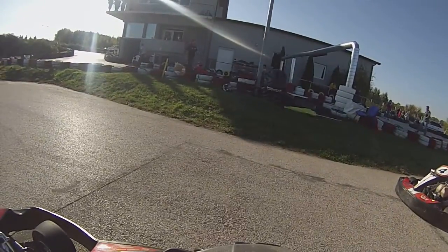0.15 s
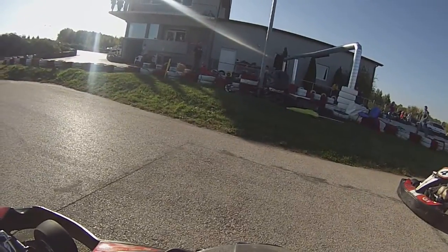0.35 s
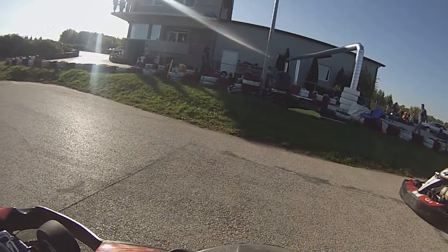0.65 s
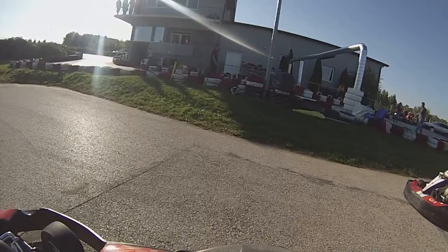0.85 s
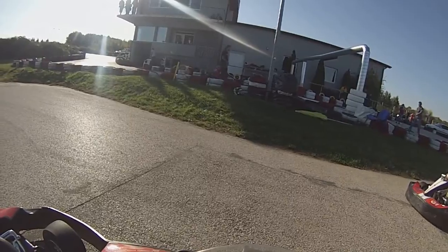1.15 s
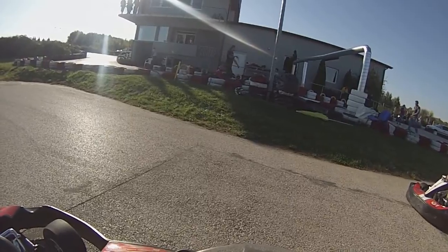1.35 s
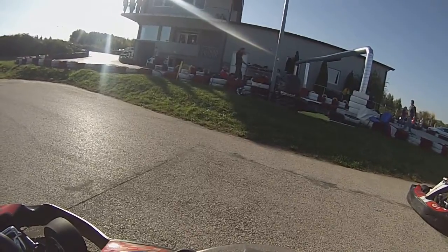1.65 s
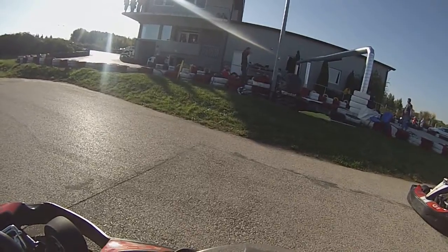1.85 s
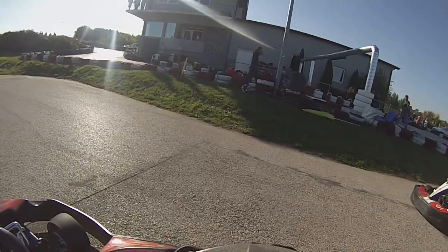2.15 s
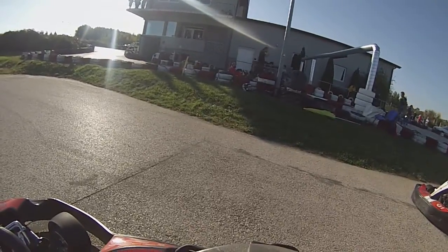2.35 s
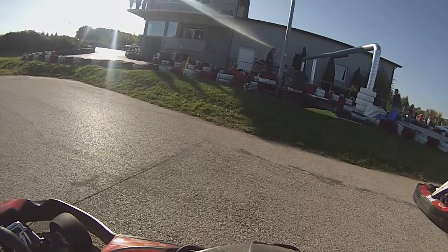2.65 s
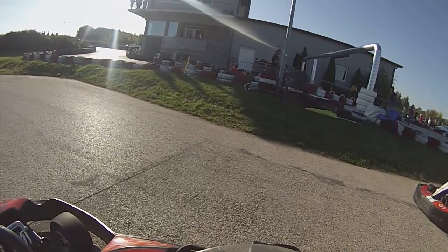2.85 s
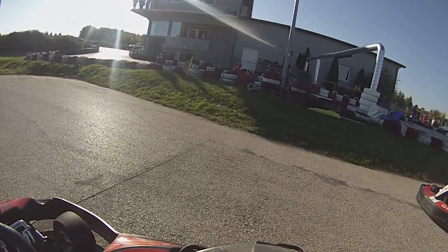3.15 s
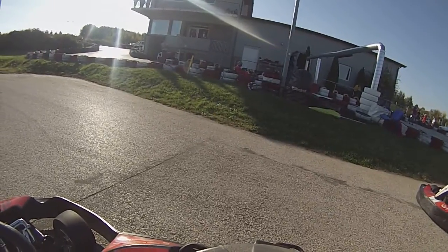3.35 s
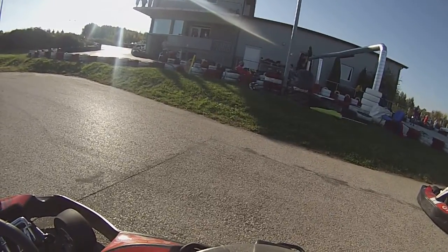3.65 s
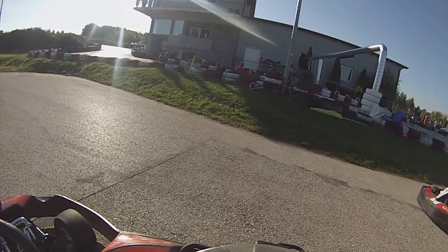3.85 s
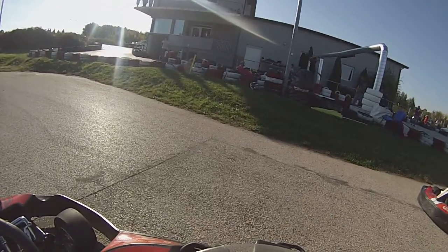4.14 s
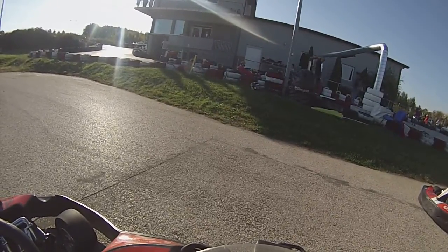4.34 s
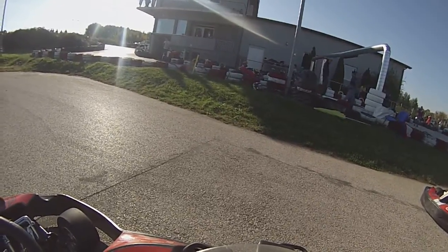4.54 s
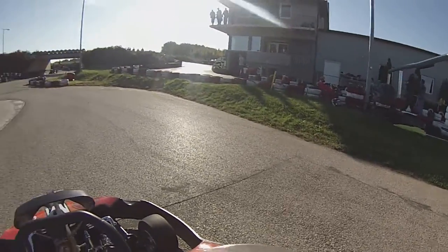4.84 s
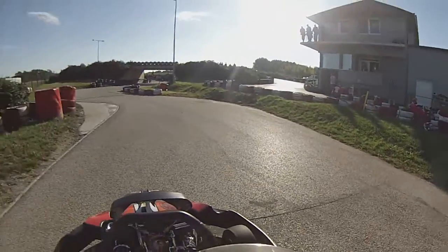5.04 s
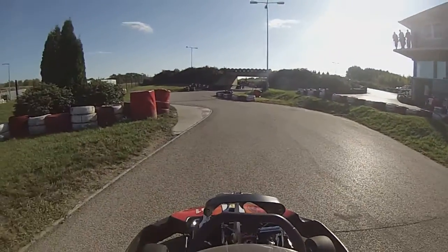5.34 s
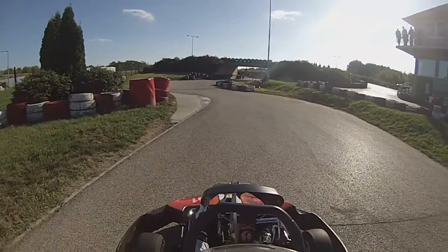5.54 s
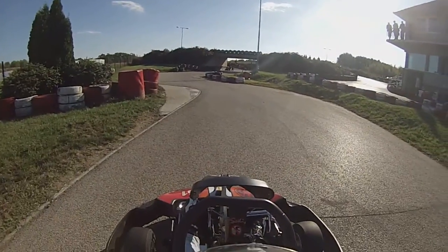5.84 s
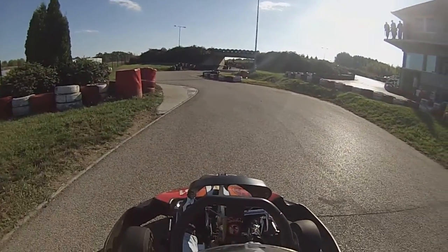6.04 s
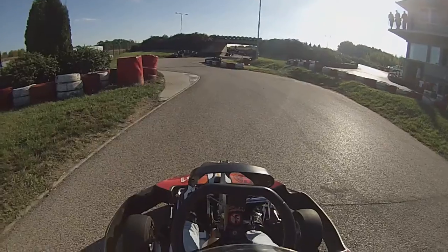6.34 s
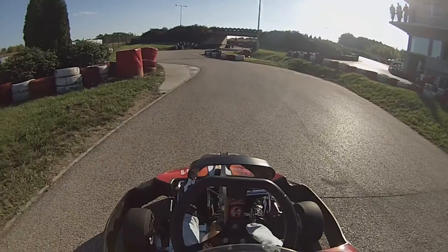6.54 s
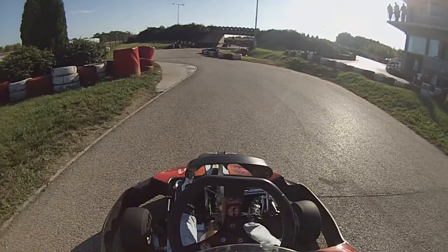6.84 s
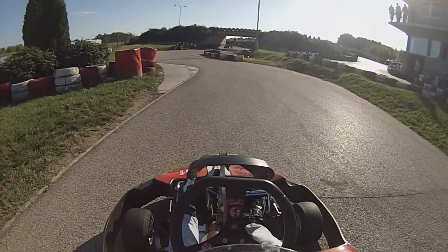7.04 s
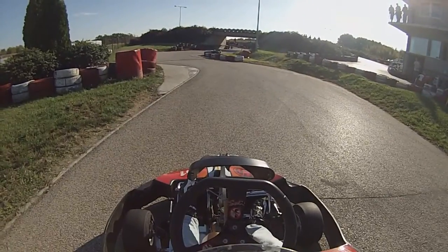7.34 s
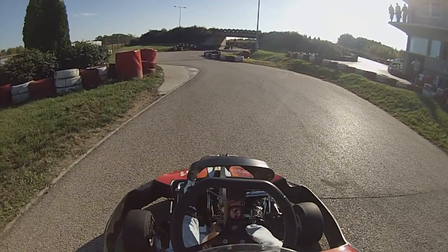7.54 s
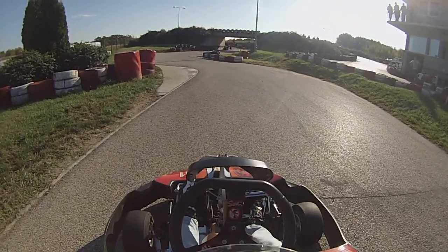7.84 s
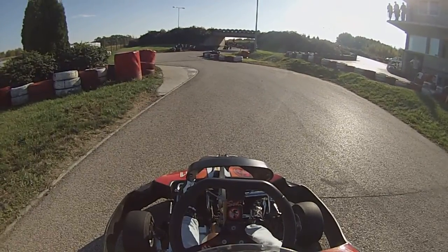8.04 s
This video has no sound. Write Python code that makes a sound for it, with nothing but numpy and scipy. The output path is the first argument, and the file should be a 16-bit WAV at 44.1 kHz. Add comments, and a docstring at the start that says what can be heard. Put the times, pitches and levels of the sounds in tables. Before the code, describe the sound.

Steady kart idle, close and boxy: deep vibration, rapid gas pulses and rattling casing repeat about fourteen times a second throughout. The low body thins when the driver looks ahead around five seconds, then the shake grows stronger once the head lowers. Behind it are blurred far engines, a wavering drone, low wind or handling bumps, faint hiss and a few loose-metal tinks. Open-air track, helmet-mounted microphone.

```python
"""A single-cylinder four-stroke kart engine idles right behind its driver, heard inside a housing on the helmet.
Crank-locked sines shake the seat, gas pulses swell in silencer and intake, and contacts and noise
ring the casing, valve cover and small parts. The driver looks aside, turns ahead, then lowers the head,
which changes the colour. Around it lie far engines and a drone of shaped noise, low thuds, hiss and tinks."""
import sys
import numpy as np
from scipy import signal
from scipy.fft import rfft, irfft
from scipy.io import wavfile

SR = 44100
rng = np.random.default_rng(int(sys.argv[2]) if len(sys.argv) > 2 else 0)


def transcribe(signal):
    """Save signal, clipped to [-1, 1], as a 16-bit WAV file at the path in sys.argv[1]."""
    frames = np.atleast_2d(signal).T
    limited = np.clip(frames, -1, 1)
    pcm = np.round(limited * 32767).astype(np.int16)
    wavfile.write(sys.argv[1], SR, pcm)


N = 361179


def from_db(db):
    """Gain of a level in dB."""
    return 10 ** (np.asarray(db) / 20)


def rms_one(x):
    """Signal scaled to rms 1."""
    return x / np.sqrt(np.mean(x ** 2) + 1e-20)


def in_time(rows):
    """Columns of a curve table after its time column, one value a sample."""
    s, *columns = np.transpose(rows)
    return [np.interp(np.arange(N) / SR, s, c) for c in columns]


def at_pose(pose, values):
    """Blend of three values, one for each head pose: 0 aside, 1 ahead, 2 ahead and lowered."""
    return np.interp(pose, range(3), values)


def resonance(x, hz, width_hz):
    """Two-pole resonance with gain 1 on top."""
    r = np.exp(-np.pi * width_hz / SR)
    top = np.array([1, 0, -1]) * (1 - r * r) / 2
    bottom = [1, -2 * r * np.cos(2 * np.pi * hz / SR), r * r]
    return signal.lfilter(top, bottom, x + 1e-18)  # the tiny offset avoids denormal numbers


def coloured(spectrum):
    """Steady noise of a given spectrum, rms 1."""
    hz, db = np.transpose(spectrum)
    grid = np.arange(1, N // 2 + 2) * SR / N
    gain = from_db(np.interp(np.log(grid), np.log(hz), db))
    return rms_one(irfft(rfft(rng.standard_normal(N)) * gain, N))


def drift(hz):
    """Slow chance below a given rate, rms 1."""
    lowpass = signal.butter(2, hz, fs=SR, output="sos")
    settled = signal.sosfilt(lowpass, rng.standard_normal(N + SR))[SR:]
    return rms_one(settled)


def each_cycle(cycle, places, level_db, jitter, spread_db):
    """Clicks at given places of every cycle, a little different in time (in cycles) and strength each round."""
    rounds = np.arange(int(cycle[-1]) + 1)[:, None]
    late, louder = rng.standard_normal((2, len(rounds), len(places)))
    at = np.searchsorted(cycle, rounds + places + jitter * late).clip(0, N)
    strength = from_db(level_db + spread_db * louder)
    return np.bincount(at.ravel(), strength.ravel(), N + 1)[:N]


# Engine speed. Each row: time in seconds, four-stroke cycles per second.
SPEED = [(0.0, 14.124), (0.6, 13.95), (1.5, 13.874), (2.5, 13.812), (3.2, 13.853), (3.7, 14.057),
         (4.4, 14.074), (4.75, 13.878), (5.15, 13.424), (5.5, 13.242), (5.8, 13.331), (7.2, 13.976),
         (7.5, 13.915), (8.19, 13.787)]


def engine_cycle():
    """Cycles run so far: the summed speed, two crank turns to a cycle."""
    return np.cumsum(in_time(SPEED)[0]) / SR


# Head movement. Each row: time in seconds, head pose (0 aside, 1 ahead, 2 ahead and lowered).
HEAD = [(0, 0.13), (4.7, 0.24), (5.1, 0.87), (6.3, 1.24), (7.0, 2.56), (8.19, 2.3)]


def head_pose():
    """The driver's head pose through time."""
    return in_time(HEAD)[0]


# Shake through seat and helmet. Each row: time in seconds, then levels in dB of the once-per-turn shake,
# the firing rock and the twice-per-turn shake.
SHAKE = [(0, -35, -48, -35.5), (.9, -34.5, -46, -36.5), (1.5, -33, -52, -34), (2.5, -33, -51, -35),
         (3.6, -31.5, -46, -36), (4.45, -31.5, -46, -34.5), (5.0, -36.5, -50, -40), (5.35, -39, -43, -42.5),
         (5.55, -34.5, -41.5, -44), (5.85, -29, -42, -41), (6.05, -29, -43, -41.5), (6.2, -32, -43, -42),
         (6.4, -29.5, -43, -41), (6.6, -29, -42, -40), (6.88, -26.5, -41, -35), (7.1, -26.5, -40, -34.5),
         (8.19, -27, -40.5, -33.5)]
# Hum that throbs while the engine runs slowest. Each row: time in seconds, level in dB near 95 Hz and near 80 Hz.
HUM = [(0, -66, -70), (4.7, -66, -62), (4.9, -60, -48), (5.2, -50, -47), (5.4, -45.5, -47),
       (5.9, -46, -48.5), (6.3, -47.5, -47), (6.6, -47, -48), (6.9, -55, -62), (8.19, -80, -80)]
# Sines for those five levels in turn. Each row: multiple of the cycle rate, offset in turns of the sine
# in each of the three head poses.
SHAKE_ORDERS = [(2, .76, .76, .79), (3, .33, .10, .17), (4, .95, .90, .90), (7, .76, .76, .76),
                (6, .38, .38, .38)]
# Slip of the once-per-turn shake against the crank while the head settles.
# Each row: time in seconds, slip in turns of the sine.
SLIP = [(0, 0), (4.6, 0), (5.2, -.05), (5.65, .12), (5.9, .1), (6.2, 0), (8.19, 0)]


def shake(cycle, pose):
    """Piston forces are clean sines locked to the crank; head pose shifts them, a loose helmet makes them waver."""
    slip = in_time(SLIP)[0]
    out = 0
    for (order, *offsets), db in zip(SHAKE_ORDERS, in_time(SHAKE) + in_time(HUM)):
        level = np.sqrt(2) * from_db(db + 1.33 * drift(5.0))
        turns = order * cycle + at_pose(pose, offsets) + 0.029 * drift(7.1)
        if order == 2:  # once per crank turn
            turns = turns + slip
        out = out + level * np.sin(2 * np.pi * turns)
    return out


# Gas pulses, each in a hollow of its own. Each row: place in the cycle 0-1, resonance in Hz, width in Hz,
# delay in cycles while looking ahead, relative level in dB in each of the three head poses.
PULSES = [(.448, 83.6, 43, 0, -4.6, -6, -4.6), (.516, 165.6, 28, .011, -6.3, -1.5, -5.5),
          (.551, 60.7, 64, 0, -.6, 0, 0), (.654, 93.4, 23, -.008, 0, -1, -1.5),
          (.705, 191.5, 60, .005, -10.5, -12, -10.5)]
# Weaker pulses in the intake, columns as for the gas pulses.
INTAKE = [(0.27, 280, 60, 0, -18, -14, -13), (0.69, 300, 80, 0, -17, -16, -17),
          (0.0, 365, 70, .07, -18, -20, -15), (.09, 137, 45, 0, -22, -10, -22)]


def gas_pulses(cycle, pose):
    """Each push goes twice through its resonance, so it swells before it dies; all vary together in strength."""
    strength = from_db(0.64 * drift(5.3))
    ahead = at_pose(pose, [0, 1, 0])
    out = 0
    for place, hz, width_hz, delay, *levels_db in PULSES + INTAKE:
        clicks = each_cycle(cycle - delay * ahead, np.array([place]), 0, jitter=.002, spread_db=.6)
        push = strength * from_db(at_pose(pose, levels_db)) * clicks
        out = out + resonance(resonance(push, hz, width_hz), hz, width_hz) / width_hz
    return rms_one(out)


# Swell of the resonances once a cycle. Each row: resonance in Hz, swing in dB, place of the top in the cycle 0-1.
SWELL = [(400, 2, .3), (770, 1.4, 0.62), (1300, 1.5, 0.1), (1360, 0.9, 0.82), (1560, 3.5, 0.79),
         (2180, 1, 0.18), (2400, 0, 0.8), (3400, 1, 0)]


def body(drive, modes, pose, cycle):
    """Parallel resonances whose levels follow the head, swell once a cycle and wander a little."""
    at_hz, swing_db, top = np.transpose(SWELL)
    wander = drift(1.7)
    out = 0
    for k, (hz, width_hz, *levels_db) in enumerate(modes):
        # a complex swing blends size and place of the top together
        swing = np.interp(hz, at_hz, swing_db * np.exp(-2j * np.pi * top))
        swell_db = np.real(swing * np.exp(2j * np.pi * cycle))
        wander_db = 0.24 * np.roll(wander, k * N // len(modes))
        level = from_db(at_pose(pose, levels_db) + swell_db + wander_db)
        out = out + (-1) ** k * resonance(level * drive, hz, width_hz)
    return out


# Rattle after valves land on their seats. Each row: place in the cycle 0-1, relative level in dB.
VALVES = [(.862, -7), (.94, -14), (.46, -11), (.14, -15)]
# Ring of the valve cover. Each row: resonance in Hz, width in Hz, relative level in dB in each of the three poses.
VALVE_RING = [(6840, 500, -35, -45, -42), (5650, 670, -39, -39.5, -39.5), (3630, 190, -36, -26, -34),
              (3164, 195, -31, -28, -29.5), (2050, 460, -30, -28, -27)]


def valves(cycle, pose):
    """Noise puffs swell in a moment, die over some 17 ms and partly repeat each cycle; they ring the cover."""
    place, puff_db = np.transpose(VALVES)
    rise, fade = np.exp(-1 / (np.array([0.0012, 0.017]) * SR))  # time constants in seconds
    landings = each_cycle(cycle, place, puff_db, jitter=.002, spread_db=.8)
    puff = signal.lfilter([1 - rise], np.convolve([1, -rise], [1, -fade]), landings)
    repeated = rng.standard_normal(3000)[(cycle % 1 * 3000).astype(int)]
    rattle = 1.2 * repeated + .75 * rng.standard_normal(N)
    ring = body(from_db(-7.5) * puff * rattle, VALVE_RING, pose, cycle)
    return signal.sosfilt(signal.butter(3, [1700, 7800], "band", fs=SR, output="sos"), ring)


# Contacts of valves, rockers and gears. Each row: place in the cycle 0-1, relative level in dB, sharpness 0-1.
CONTACTS = [(.02, -6, 0.1), (0.058, -12, 0), (.145, -7, 0), (.18, -12.5, 0.3), (.265, 0.5, 0),
            (0.368, -13.5, 0.1), (.49, -4.5, 0), (.56, -14.5, 0.3), (.61, 4, 0.3), (.68, -2, 0),
            (.755, -6, .25), (.82, 5.5, .3), (0.899, -25, 0.2), (.935, -4.5, 0.4), (.965, -13.5, 0.1)]
# Air rush and gear rattle through one cycle. Each row: place in the cycle 0-1, relative level in dB.
RUSH = [(0, 1), (.15, 0.3), (.27, -0.4), (.33, -3.5), (.43, -0.5), (.48, 1.5), (.65, -2.1), (.78, -1.4),
        (.9, 0.3)]
# Engine casing heard through the housing. Each row: resonance in Hz, width in Hz,
# relative level in dB in each of the three head poses.
CASING = [(380, 85, -19.5, -17, -19.5), (562, 63, -17, -17.5, -14.5), (756.4, 32, -10, -11.5, -12),
          (857, 72, -14, -15.5, -15), (1200, 106, -4.5, -0.5, -3), (1323.6, 83, -0.5, 2.5, 1),
          (1430, 89.3, 1, 0.5, 1), (1520, 120, -4.5, -3, -6.5), (1578, 46, -2.5, -5, -5.5),
          (1715, 94, -11, -15, -10.5), (1890, 67, -14.5, -12.5, -15), (2056, 32, -9, -9, -8.5),
          (2160, 68, -11.5, -10, -9), (2276, 57, -13.5, -12, -13.5), (2530, 84, -17.5, -20.5, -19.5),
          (2860, 77, -21.5, -25.5, -32), (3078, 125, -25, -41.5, -30), (3670, 570, -33, -31, -26.5),
          (3880, 170, -27.5, -23.5, -22), (4400, 1170, -31, -36.5, -33), (4640, 480, -28.5, -32, -29),
          (5950, 130, -35, -37, -32.5), (6560, 500, -36, -49, -45)]


def clatter(cycle, pose):
    """Contacts, a gear rattle that repeats every cycle and fan noise ring one casing; the valve rattle joins."""
    place, db, sharp = np.transpose(CONTACTS)
    sharp_db = db + 20 * np.log10(np.clip(sharp, .01, 2))
    blunt = each_cycle(cycle, place, db, jitter=.0004, spread_db=1.2)
    edge = np.diff(each_cycle(cycle, place, sharp_db, jitter=.0003, spread_db=1.2), prepend=0)
    teeth = each_cycle(cycle, rng.random(400), rng.normal(-19, 1.5, 400), jitter=.0002, spread_db=1.2)
    fan = from_db(-25.5) * rng.standard_normal(N)
    rush = from_db(np.interp(cycle, *np.transpose(RUSH), period=1))
    casing = body(from_db(-7) * blunt + edge + rush * (teeth + fan), CASING, pose, cycle)
    # the housing dulls the top
    casing = signal.sosfilt(signal.butter(2, 7400, fs=SR, output="sos"), casing)
    return rms_one(casing + from_db(-7) * valves(cycle, pose))


# Knocks of rockers and valves. Each row: place in the cycle 0-1, then relative level in dB
# in the rocker arms, in the cover and in the valve stems.
KNOCKS = [(.02, -2, -14, -18), (.09, 0, -14, -20), (.172, -3, -9, -8), (.478, -9, -10, -7),
          (.65, -5, -16, -24), (.79, -1, -16, -24), (.868, 0, 0, 0), (.93, 0, -7, -11)]
# What the knocks ring. Each row: part (0 rocker arms, 1 cover, 2 valve stems), resonance in Hz, width in Hz,
# peak in dB of a 0 dB knock in each of the three head poses.
KNOCK_RING = [(0, 2060, 180, -49.5, -50.5, -50), (0, 2290, 220, -54, -53, -52),
              (1, 3050, 350, -52, -59, -57), (1, 3700, 400, -58, -56, -58), (1, 5200, 900, -63, -64, -66),
              (2, 6900, 360, -57.5, -77, -74), (2, 9300, 1200, -73, -90, -88)]


def knocks(cycle, pose):
    """Soft-edged contacts: each ring swells to its peak and dies within a few ms."""
    place, *parts_db = np.transpose(KNOCKS)
    blows = [each_cycle(cycle, place, db, jitter=.0012, spread_db=1.3) for db in parts_db]
    out = 0
    for part, hz, width_hz, *levels_db in KNOCK_RING:
        ring = resonance(resonance(blows[int(part)], hz, width_hz), hz, width_hz)
        to_peak_one = np.e * SR / (2 * np.pi * width_hz)
        out = out + from_db(at_pose(pose, levels_db)) * to_peak_one * ring
    return out


# Spectrum of other engines around the track. Each row: frequency in Hz, relative density in dB per Hz.
FAR = [(10, -8), (45, -6), (90, -7), (125, -18.5), (200, -24), (280, -25), (450, -28), (650, -34),
       (1000, -40), (1500, -60)]
# Their loudness. Each row: time in seconds, level in dB.
FAR_LEVEL = [(0, -44.5), (1.8, -47), (5.6, -44.5), (6.4, -50.5), (7.0, -47), (7.5, -48.5), (7.9, -50),
             (8.19, -39)]


def far_engines():
    """Other engines blur into low coloured noise with a drifting level."""
    return from_db(in_time(FAR_LEVEL)[0] + 1.7 * drift(9.4)) * coloured(FAR)


# Bands of a wavering drone among the far engines. Each row: centre in Hz, width in Hz, relative level in dB.
DRONE = [(277.7, 52, 9.5), (383, 19, -1)]
# Loudness of the drone. Each row: time in seconds, level in dB.
DRONE_LEVEL = [(0, -70), (.9, -55.5), (1.7, -64), (3.2, -75), (3.6, -72), (4.6, -57), (5.0, -77),
               (6.0, -66), (6.35, -52), (6.7, -67), (7.4, -54.5), (7.7, -53.5), (7.9, -87), (8.19, -58)]


def drone():
    """Noise in two narrow bands that come and go."""
    bands = 0
    for hz, width_hz, db in DRONE:
        band = resonance(rng.standard_normal(N), hz, width_hz)
        bands = bands + from_db(db + 6.2 * drift(1.54)) * band
    return from_db(in_time(DRONE_LEVEL)[0]) * rms_one(bands)


# Low thuds of wind and head movement. Each row: time in seconds, rise over the rumble in dB.
THUDS = [(1.6, 3), (4.68, 6), (6.2, 10)]
RUMBLE_DB, THUD_SWELL_S = -49, 0.057  # steady rumble; spread of the bell-shaped swell


def thuds():
    """A very low noise rumble that swells briefly at each thud."""
    s, rise_db = np.transpose(THUDS)
    away = (np.arange(N)[:, None] / SR - s) / THUD_SWELL_S
    swell_db = np.exp(-.5 * away ** 2) @ rise_db
    return from_db(RUMBLE_DB + swell_db) * rms_one(resonance(drift(18), 11, 12))


# Spectrum of the microphone hiss. Each row: frequency in Hz, relative density in dB per Hz.
HISS = [(1000, 10.5), (5000, 7.5), (7000, 1.5), (8600, -1), (10300, -6.5), (12000, -11.5), (13500, -38),
        (15400, -32)]
HISS_DB = -66.5


def hiss():
    """Steady coloured noise of the microphone."""
    return from_db(HISS_DB) * coloured(HISS)


# Small loose-metal tinks. Each row: start in seconds, peak in dB, pitch in Hz.
TINKS = [(5.659, -52, 2580), (7.592, -58, 3480), (7.636, -56, 3480)]


def tinks():
    """Brief sine rings of a loose part, each at its peak after 6 ms."""
    t = np.arange(N) / SR
    out = np.zeros(N)
    for s, db, hz in TINKS:
        age = np.maximum(t - s, 0) / 0.006
        out += from_db(db) * age * np.exp(1 - age) * np.sin(2 * np.pi * hz * t)
    return out


# air-borne levels in dB with the head aside, ahead, lowered
GAS_DB, CLATTER_DB = (-39.5, -46, -42), (-44, -45, -44.5)


def scene():
    """The engine's parts over far engines, drone, low thuds, hiss and tinks."""
    cycle, pose = engine_cycle(), head_pose()
    engine = shake(cycle, pose) + knocks(cycle, pose)
    engine += from_db(at_pose(pose, GAS_DB)) * gas_pulses(cycle, pose)
    engine += from_db(at_pose(pose, CLATTER_DB)) * clatter(cycle, pose)
    return (engine + far_engines() + drone() + thuds() + hiss() + tinks())[None]


CUTOFF_HZ = 14900  # 70 dB down from here up


def record(dry):
    """A steep low-pass cuts the top."""
    return signal.sosfilt(signal.cheby2(20, 70, CUTOFF_HZ, fs=SR, output="sos"), dry)


dry = scene()
out = record(dry)
transcribe(out)
```